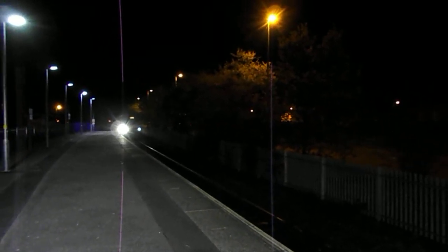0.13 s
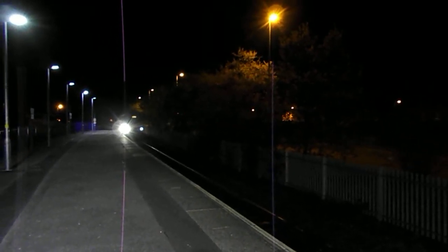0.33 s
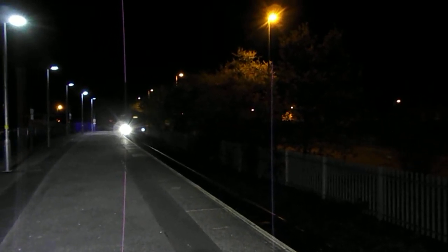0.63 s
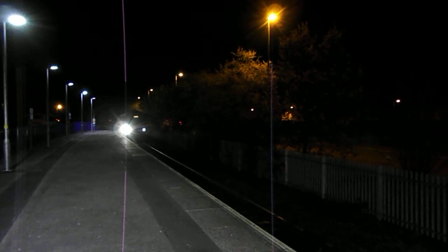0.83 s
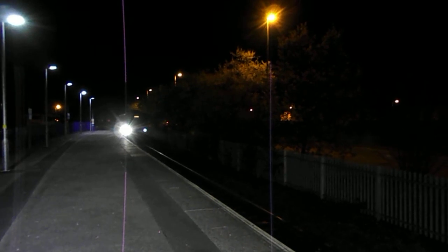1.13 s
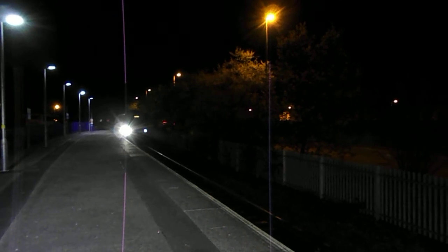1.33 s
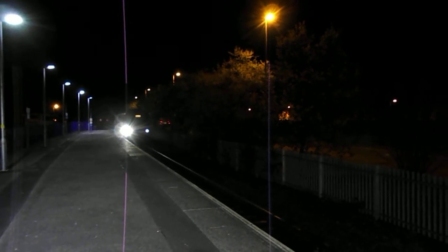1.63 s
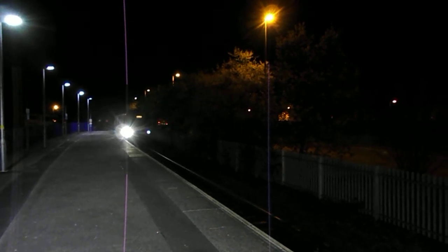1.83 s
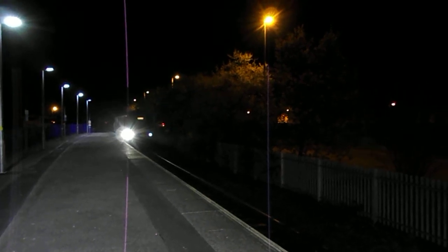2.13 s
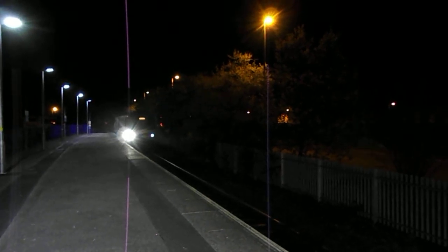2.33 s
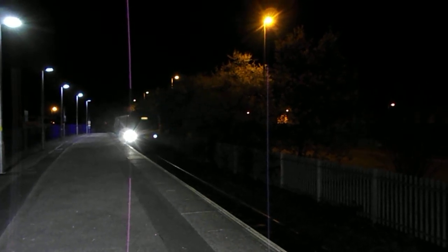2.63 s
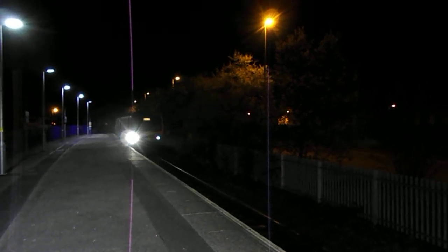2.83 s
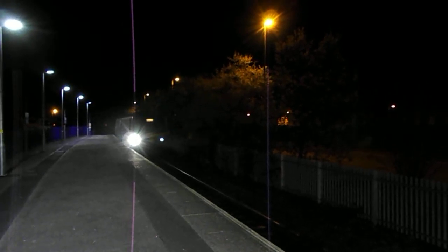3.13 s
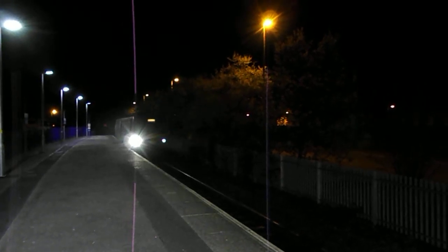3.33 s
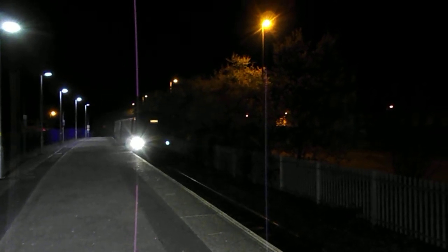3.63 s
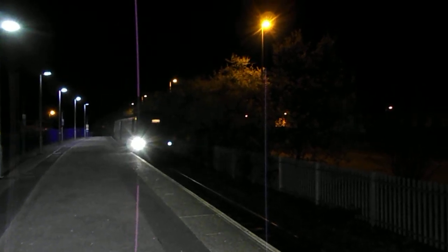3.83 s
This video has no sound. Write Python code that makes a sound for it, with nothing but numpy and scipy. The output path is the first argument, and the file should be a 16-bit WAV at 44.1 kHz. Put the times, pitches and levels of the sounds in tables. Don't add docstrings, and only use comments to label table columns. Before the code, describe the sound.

Train wheel squeal, thin and very high with a fast flutter, swells over quiet night-platform air and fades

```python
import sys
import numpy as np
from scipy import signal
from scipy.fft import rfft, irfft
from scipy.io import wavfile
from scipy.ndimage import uniform_filter1d

SR = 44100
rng = np.random.default_rng(int(sys.argv[2]) if len(sys.argv) > 2 else 0)


def bounce(signal):
    frames = np.transpose(np.atleast_2d(signal))
    limited = np.clip(frames, -1, 1)
    pcm = np.round(limited * 32767).astype(np.int16)
    wavfile.write(sys.argv[1], SR, pcm)


def boost_factor(decibels):
    exponent = np.asarray(decibels, float) / 20
    return 10 ** exponent


N = 176400
T = np.arange(N) / SR


def evened(x):
    return x / np.sqrt(np.mean(x ** 2) + 1e-20)


def curve(rows, axis=1):
    rows = np.array(rows, float)
    return np.interp(T, rows[:, 0], rows[:, axis])


def slow(rate_hz):
    f = np.fft.rfftfreq(N, 1 / SR)
    return evened(irfft(rfft(rng.standard_normal(N)) / (1 + (f / rate_hz) ** 4), N))


def sine(hz):
    cycles = np.cumsum(hz) / SR if np.ndim(hz) else hz * T
    return np.sqrt(2) * np.cos(2 * np.pi * cycles)


def ring(hz, width_hz):
    r = np.exp(-np.pi * width_hz / SR)
    noise = rng.standard_normal(N) + 1j * rng.standard_normal(N)
    fuzz = signal.lfilter([1], [1, -2 * r, r * r], noise)
    return evened((fuzz * np.exp(2j * np.pi * hz * T)).real)


# pitch_hz, width_hz, level_db
PLACE_COLOUR = [(370, 40, -5), (490, 30, -4), (980, 60, -3), (2150, 200, 3), (3450, 150, 2), (5200, 120, 3),
                (6170, 140, 3), (6600, 150, -3), (7150, 110, 8), (7670, 90, -18), (8210, 110, 6),
                (9080, 70, 6), (9510, 40, 9), (10040, 50, 6)]


def wash(spectrum, patchy_db, colour):
    frames, f = N // 512 + 5, np.fft.rfftfreq(2048, 1 / SR)
    real, imag, patches = rng.standard_normal((frames, 1025, 3)).T
    patches = uniform_filter1d(patches, size=20, axis=0)
    patches = evened(uniform_filter1d(patches, size=8, axis=1))
    hz, level_db = np.transpose(spectrum)
    shape = np.interp(np.log(f + 1), np.log(hz + 1), level_db, left=-80, right=-80)
    tint = sum(db * np.exp(-.5 * ((f - mid) / width) ** 2) for mid, width, db in PLACE_COLOUR)
    z = (real + 1j * imag) * boost_factor((shape + colour * tint)[:, None] + patchy_db * patches)
    return evened(signal.istft(z, nperseg=2048, noverlap=1536)[1][:N])


# pitch_hz, level_db (per Hz)
AIR_SPECTRUM = [(15, -59.5), (25, -13.5), (113, -2), (320, -5), (472, -4), (2080, -13.5), (3070, -17.5),
                (7240, -19), (12500, -32.5), (16200, -70.5), (22000, -120)]


def night_air():
    return wash(AIR_SPECTRUM, patchy_db=0.64, colour=1) * boost_factor(-42 + 0.2 * slow(rate_hz=2.7))


# pitch_hz, level_db (per Hz)
TRAFFIC_SPECTRUM = [(200, -3.5), (400, -7.5), (650, 1), (1000, 0.5), (2100, -4), (2700, -9.5), (4000, -11),
                    (8000, -46.5)]
# time_s, level_db
TRAFFIC_LEVEL = [
    (0, -41.5),
    (.4, -40),
    (.65, -42.5),
    (1.05, -44),
    (1.45, -51.5),
    (2.2, -77.5),
    (4, -55.5),
]


def traffic():
    rush = wash(TRAFFIC_SPECTRUM, patchy_db=0.9, colour=0.94)
    return rush * boost_factor(curve(TRAFFIC_LEVEL) + .8 * slow(rate_hz=21))


# pitch_hz, level_db
LAMP_TONES = [(7421, -70), (7617, -84), (9514, -72), (9808, -80)]


def lamp_whine():
    return sum(boost_factor(db + 3.1 * slow(rate_hz=2)) * sine(hz) for hz, db in LAMP_TONES)


# pitch_hz, width_hz, level_db
RAIL_MODES = [(875, 35, -51.5), (756, 37, -54), (542, 59, -60.5), (205, 15, -49), (1150, 31, -56.5)]
# time_s, level_db
ROLLING = [
    (0, -18.5),
    (2.3, -5.5),
    (2.85, -2),
    (3.1, -14.5),
    (3.45, -4.5),
    (3.65, -4.5),
    (4, -4.5),
]
# time_s, level_db
HUM_LEVEL = [
    (2.7, -60),
    (2.85, -45),
    (3.0, -49),
    (3.09, -58),
    (3.2, -49),
    (3.31, -57),
    (3.44, -45),
    (3.58, -56),
    (4, -53),
]


def rails():
    note = sine(646 + 6 * slow(rate_hz=7.9))
    hum = note * boost_factor(curve(HUM_LEVEL) + 1.7 * slow(rate_hz=13))
    modes = sum(boost_factor(db + 1.5 * slow(rate_hz=3.4)) * ring(hz, width) for hz, width, db in RAIL_MODES)
    return hum + modes * boost_factor(curve(ROLLING))


# peak_s, level_db, pitch_hz, direction (+1 or -1)
BUFFETS = [(1.78, -35, 130, -1), (1.797, -28, 133, -1), (1.876, -26, 185, -1), (1.905, -25, 187, -1),
           (1.93, -21, 181, -1), (1.944, -23, 172, -1), (1.957, -30, 143, 1), (1.977, -22, 167, 1),
           (1.996, -23, 218, -1), (2.011, -17, 178, 1), (2.025, -26, 199, -1), (2.05, -32, 163, -1),
           (2.063, -20, 184, -1), (2.081, -19, 235, -1), (2.099, -29, 164, 1), (2.114, -27, 186, -1),
           (2.129, -29, 174, 1)]
# peak_s, level_db, pitch_hz, direction (+1 or -1)
STRAY_BUFFETS = [
    (1.36, -39, 100, 1),
    (1.70, -41, 90, 1),
    (1.735, -39, 160, -1),
    (1.853, -36, 150, 1),
    (1.915, -30, 120, -1),
    (2.012, -25, 380, 1),
    (1.928, -28, 340, 1),
    (2.078, -26, 380, 1),
    (3.42, -38, 90, -1),
    (3.705, -36, 110, 1),
]


def wind():
    out, puffs = np.zeros(N), np.zeros(N)
    rows = list(BUFFETS) + list(STRAY_BUFFETS)
    for (s, db, hz, way), (lean, wide) in zip(rows, rng.standard_normal((len(rows), 2))):
        cycles = (T - s) * hz
        v = cycles / (0.38 * (1 + .1 * wide))
        push = np.exp(-np.where(v > 0, v / 1.72, v) ** 2)
        swing = np.cos(2 * np.pi * cycles + 0.18 * lean)
        thump = np.exp(-(v * .6) ** 2) * np.sin(2 * np.pi * .6 * cycles)
        out += np.sign(way) * (boost_factor(db + 0.5) * push * swing - boost_factor(db - 8) * thump)
        puffs += boost_factor(db - 9) * np.exp(-(v / 2.45) ** 2)
    return out + puffs * (ring(150, 176) + 0.33 * ring(330, 150))


# time_s, level_db, upper_flutter_db (re level)
SQUEAL_LEVEL = [(1.2, -78, -15), (2.1, -55, -14), (2.4, -38, -18), (2.54, -36, -13), (2.68, -27, -10),
                (2.76, -24, -12), (2.85, -14, -18), (3.03, -16.5, -9), (3.1, -14, -12), (3.31, -17, -4),
                (3.39, -15.5, -6), (3.52, -19.5, -3), (3.59, -19, -4), (3.73, -24.5, -5), (3.87, -33.5, -5),
                (4.0, -45, -6)]
# time_s, pitch_hz
SQUEAL_PITCH = [(1.5, 7420.5), (2.5, 7418.6), (3.2, 7416.2), (3.5, 7416.9), (3.9, 7419.1)]
# time_s, rate_hz
FLUTTER_RATE = [(2.4, 20.6), (2.75, 19), (3.05, 18.5), (3.25, 17.1), (3.9, 16.4)]


def squeal():
    turn = 2 * np.pi * np.cumsum(curve(SQUEAL_PITCH)) / SR + .06 * slow(rate_hz=53)
    beats = np.cumsum(curve(FLUTTER_RATE)) / SR
    dip_s = 3.098
    beat = 2 * np.pi * (beats - beats[round(dip_s * SR)] + .5)
    level_db = curve(SQUEAL_LEVEL)
    upper = boost_factor(curve(SQUEAL_LEVEL, axis=2) + 1.2 * slow(rate_hz=5))
    lower = boost_factor(-15 + .4 * (level_db + 15) + 2 * slow(rate_hz=5))
    slip = 2 * np.pi * (.66 - .6 * np.maximum(T - 3.3, 0))
    tone = np.cos(turn) + upper * np.cos(turn + beat)
    tone += lower * np.cos(turn - beat + slip)
    tone += boost_factor(-24) * np.cos(turn + 2 * beat)
    return np.sqrt(2) * tone * boost_factor(level_db + 1.2 * slow(rate_hz=58))


# pitch_hz, level_db (per Hz)
GRIND_SPECTRUM = [(2500, -24.5), (3500, -8), (5200, -2), (6500, -0.5), (7300, 2), (8200, -1), (9500, -3.5),
                  (12000, -30.5)]
# pitch_hz, width_hz, level_db (re squeal)
WHEEL_MODES = [(7190, 90, -27), (7280, 60, -27), (7120, 70, -29), (7530, 60, -30), (7485, 30, -29),
               (7350, 50, -31), (7700, 60, -42), (6900, 150, -40)]


def grinding():
    effort_db = curve(SQUEAL_LEVEL) + 15
    scrape_db = 5 * np.exp(-((T - 2.41) / .07) ** 2)
    hiss = wash(GRIND_SPECTRUM, patchy_db=1.4, colour=.75)
    modes = sum(boost_factor(db + 1.5 * slow(rate_hz=8)) * ring(hz, width) for hz, width, db in WHEEL_MODES)
    return hiss * boost_factor(-44.5 + 0.38 * effort_db + scrape_db) + modes * boost_factor(effort_db - 9.5)


# pitch_hz, level_db, t60_s
TICK_MODES = [(2584, -0.5, 0.011), (8700, 5.5, 0.0027), (2270, -6.5, 0.0072), (3590, -7.5, 0.0083),
              (4720, -5.5, 0.0057), (6700, 1.5, 0.0033), (1030, -14, 0.013), (585, -16.5, 0.022),
              (9800, -7, 0.0055)]


def tick():
    t = np.maximum(T - 3.3838, 0)
    out = np.zeros(N)
    for hz, db, t60 in TICK_MODES:
        rise = np.minimum(t * hz / 1.2, 1)
        out += rise * boost_factor(db - 60 * t / t60) * np.sin(2 * np.pi * hz * t)
    return boost_factor(-5) * out


def scene():
    place = night_air() + traffic() + lamp_whine()
    train = rails() + squeal() + grinding()
    return (place + train + wind() + tick())[None]


def low_pass(x):
    return signal.sosfilt(signal.butter(12, 12370, fs=SR, output="sos"), x)


def record(dry):
    low = signal.butter(2, 46.4, "high", fs=SR, output="sos")
    top = signal.butter(8, 10640, fs=SR, output="sos")
    mix = signal.sosfilt(np.vstack([low, top]), dry)
    return low_pass(mix)


dry = scene()
out = record(dry)
bounce(out)
```